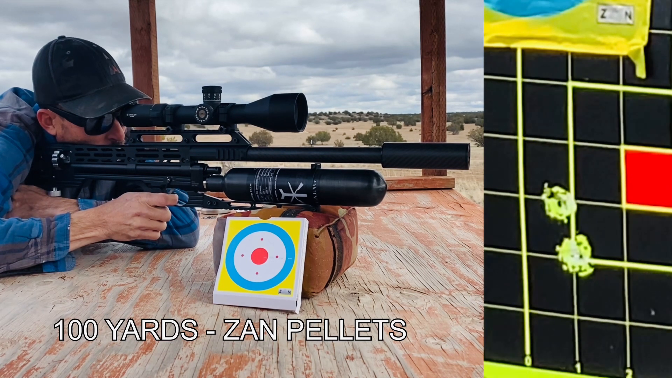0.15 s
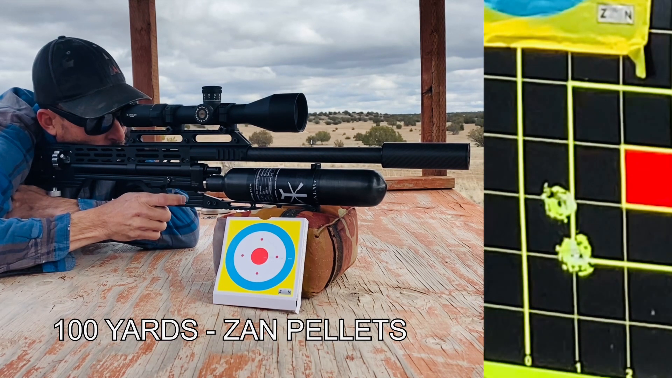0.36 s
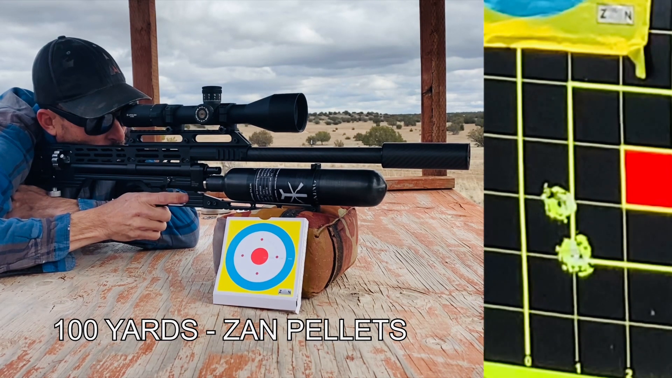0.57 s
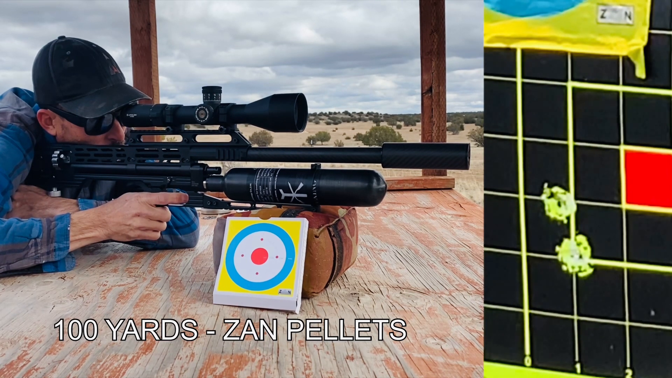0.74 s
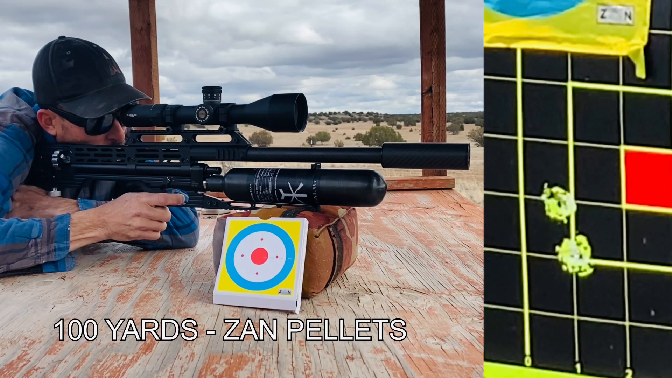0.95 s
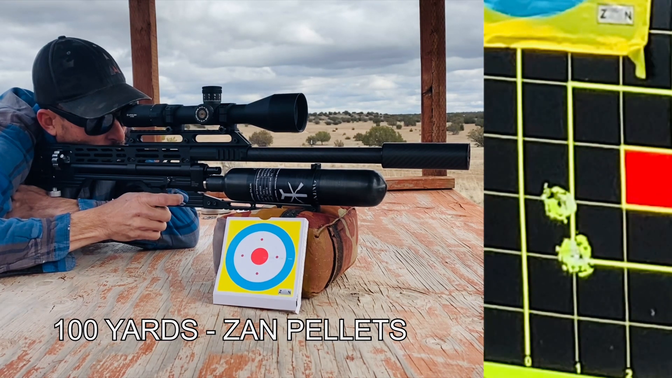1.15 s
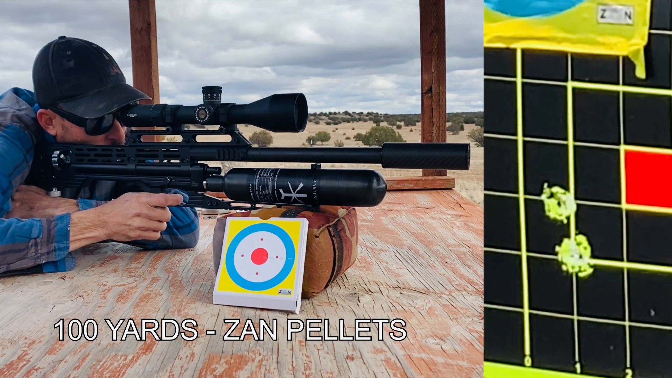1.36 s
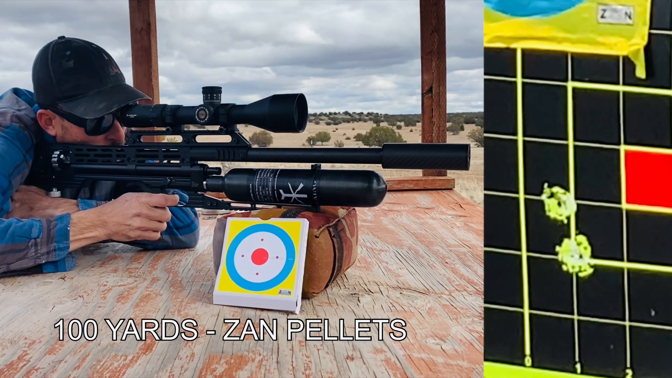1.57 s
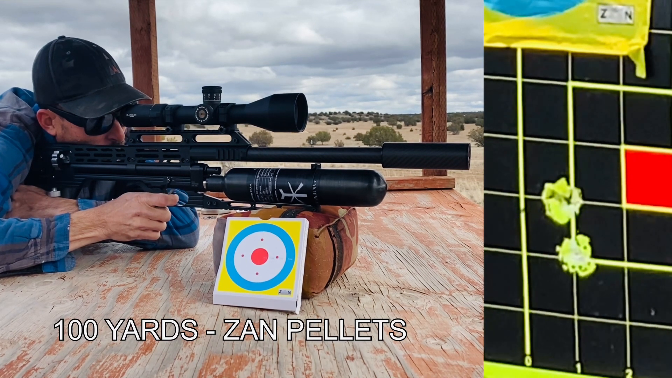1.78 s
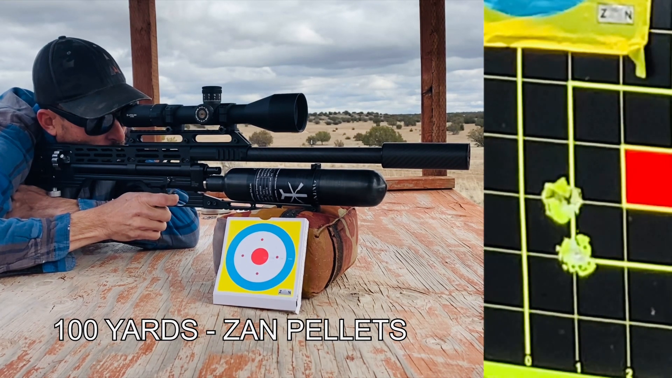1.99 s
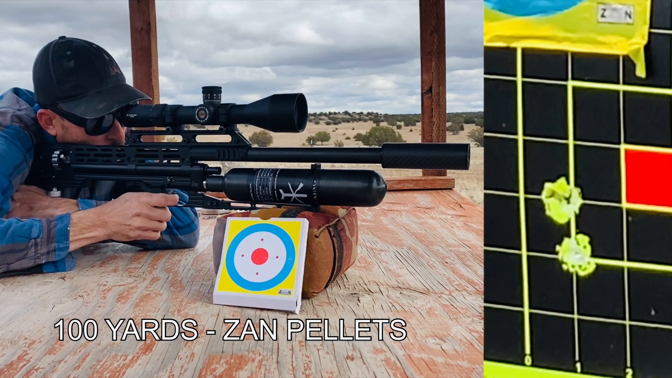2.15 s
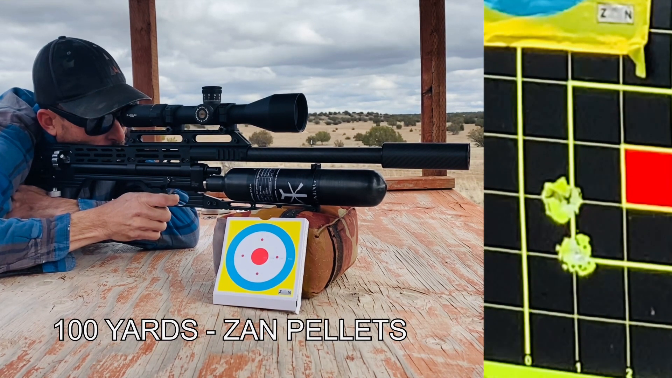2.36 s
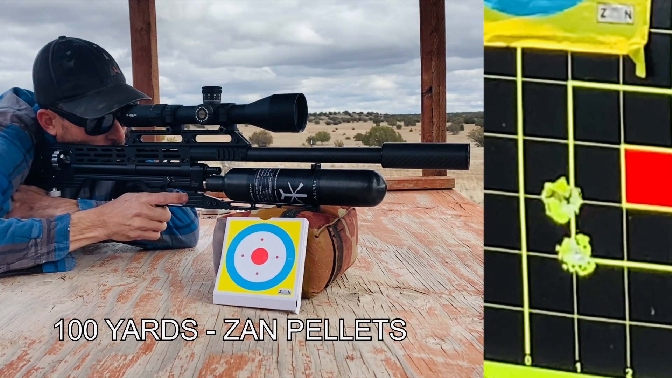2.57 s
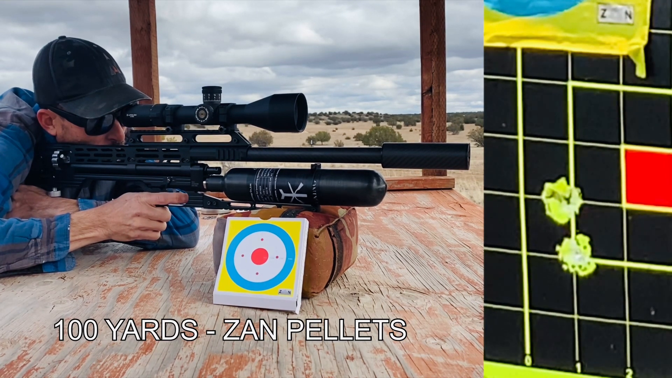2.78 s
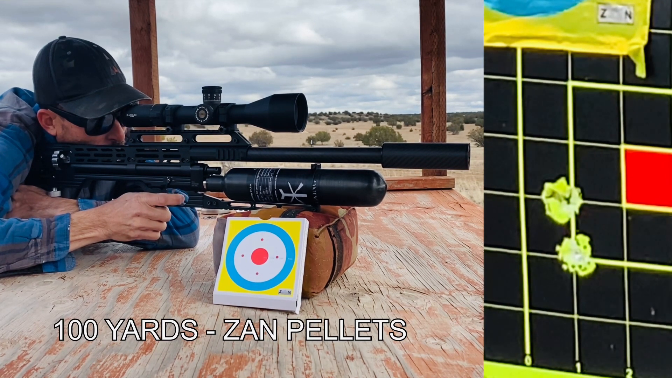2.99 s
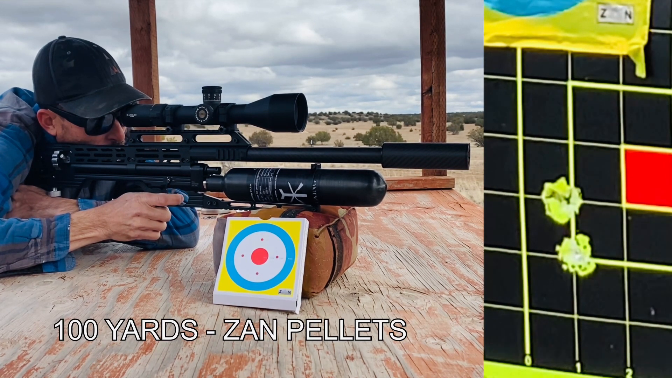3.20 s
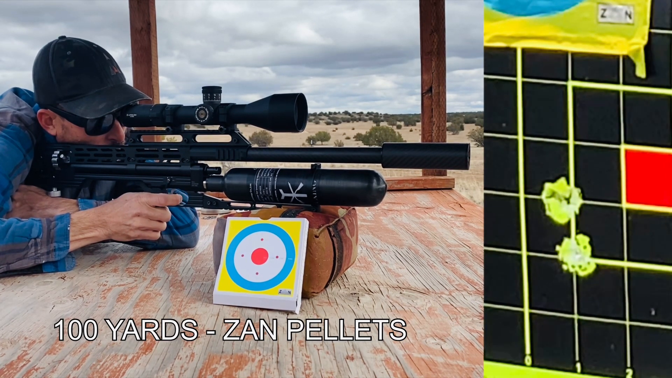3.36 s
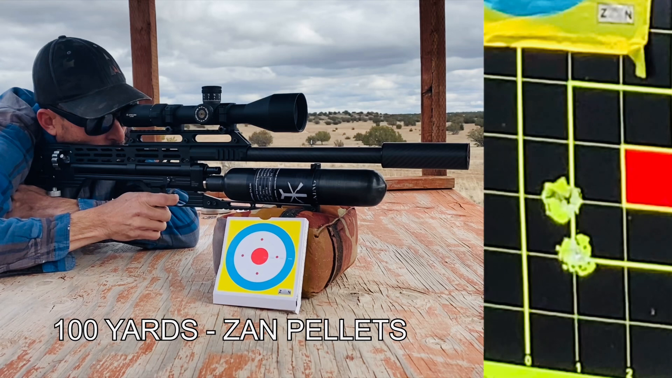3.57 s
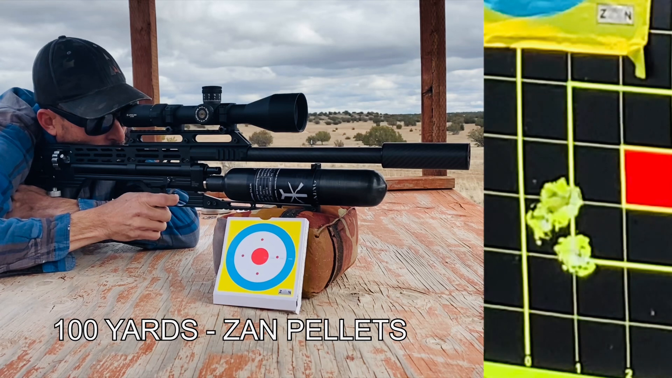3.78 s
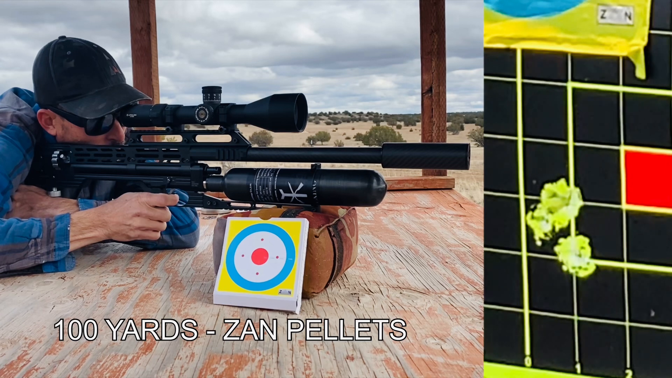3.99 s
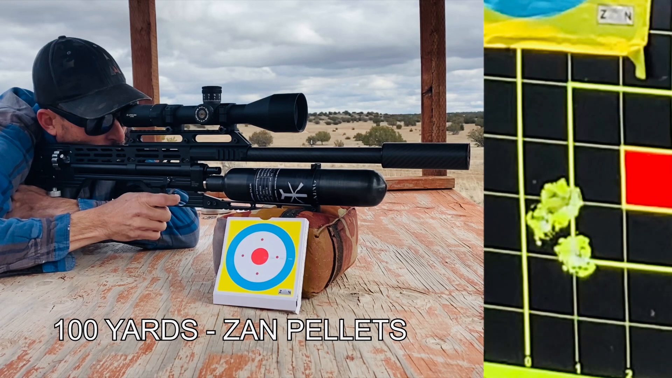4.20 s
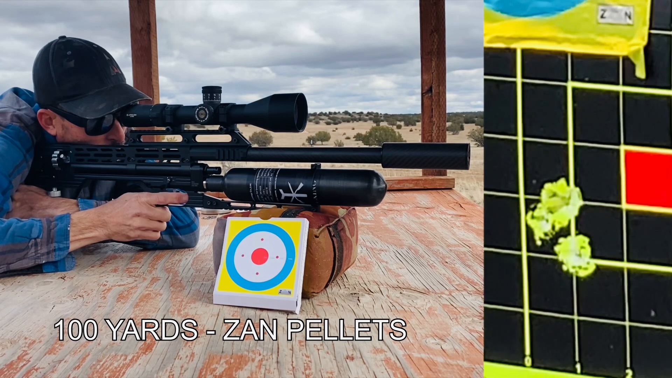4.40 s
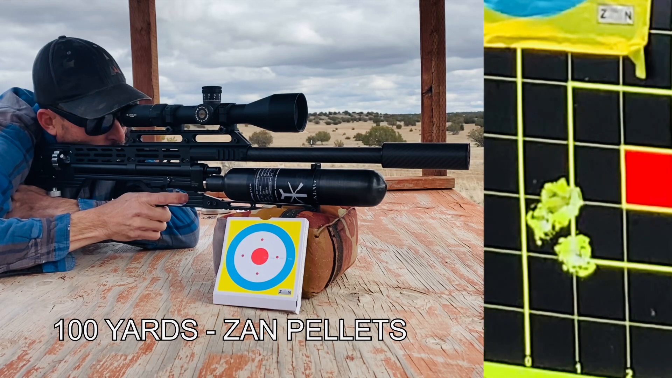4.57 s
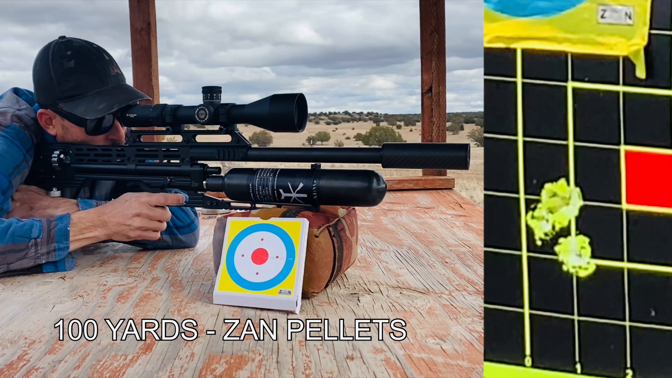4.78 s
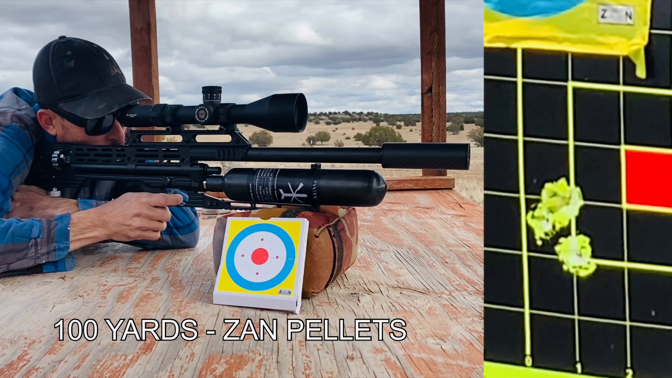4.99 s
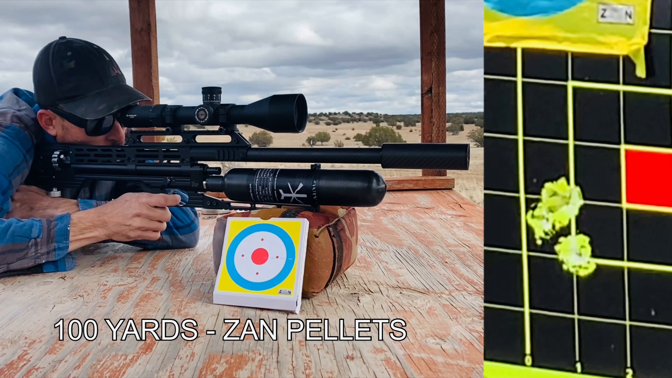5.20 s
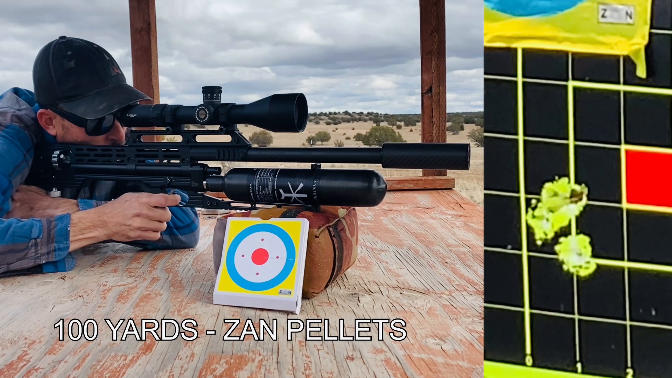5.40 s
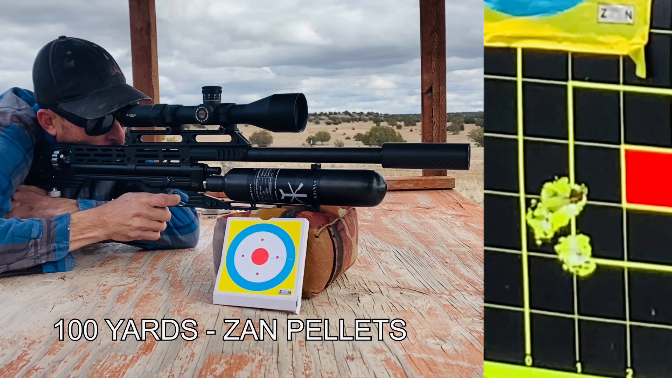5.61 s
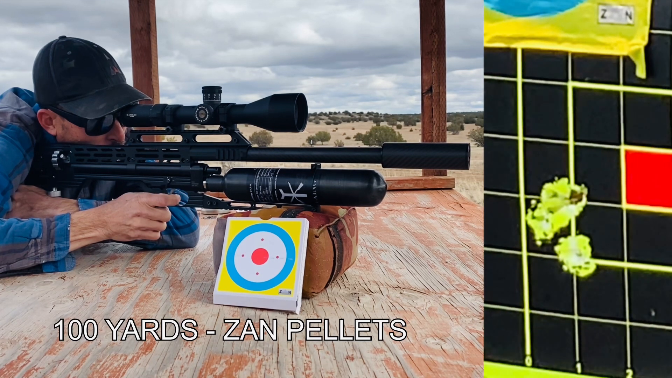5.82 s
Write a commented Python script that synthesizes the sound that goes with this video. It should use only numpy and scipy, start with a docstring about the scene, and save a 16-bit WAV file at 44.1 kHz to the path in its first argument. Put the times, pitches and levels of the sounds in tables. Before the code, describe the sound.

Outdoors under an open shelter, recorded in stereo on a phone about a metre from an air rifle on a wooden bench. At first a low boom and ringing sheet steel from an earlier shot die away, with a faint distant smack at 0.06 s and a small trigger click at 0.4 s. Light wind rumbles and buffets the microphone. At 1.5 s the rifle fires: a very loud, dry crack of air with a short thump, two quick metal clicks and a thin, high whistle sinking away. Nearby steel crashes and rings at 1.7 s; the far target smacks softly at 2.1 s with a grainy swell and hillside echo. A trigger click follows at 2.5 s. The pattern repeats with shots at 3.4 and 5.2 s, clangs at 3.6, the most ringing, and 5.4 s, and distant hits at 4.0 and 5.8 s. A click at 4.3 s and faint dull ticks fall between.

```python
"""First the boom of an earlier shot dies away under an open shelter, sheet steel still rings and a far target is hit.
Then a self-loading air rifle fires three shots from a wooden bench, a metre from the phone: filtered noise hisses,
damped modes thump, a sinking sine is the pellet's whistle and bright noise bursts are the action's clicks.
Sheet steel nearby crashes as noise and rings as modes; the far target comes back late, as noise with an echo.
Behind it all low noise and short sine buffets are the light wind on the two microphone ports."""
import sys
import numpy as np
from scipy import signal
from scipy.fft import rfft, irfft
from scipy.io import wavfile
from scipy.ndimage import uniform_filter1d

SR = 44100
rng = np.random.default_rng(int(sys.argv[2]) if len(sys.argv) > 2 else 0)


def generate_wav(sig):
    """Save sig (samples, or channels by samples) to the path in sys.argv[1] as 16-bit PCM at SR."""
    pcm = np.round(np.clip(np.atleast_2d(sig).T, -1, 1) * 32767).astype(np.int16)
    wavfile.write(sys.argv[1], SR, pcm)


N = 257984  # length [samples]
LEAD = 2048  # samples before the onset in every single sound


# Shots on the bench, a metre away:
# (time [s], blast level [dB], delay of the muzzle thump [s], thump level [dB])
SHOTS = [(1.5185, -13, .0115, -9), (3.3972, -13, .0128, -8), (5.1765, -13, .0115, -10)]


def shot(blast_db, delay_s, thump_db, size=65536):
    """Air and hammer noise reach the ports partly unlike; thump, barrel and whistle are in the shared row only."""
    t = (np.arange(size) - LEAD) / SR
    noises = hammer(t) + blast(t, blast_db) + shelter_boom(size, .022)
    tones = thump(size, delay_s, thump_db) + barrel(size) + whistle(t)
    return noises + np.array([[1], [0]]) * tones


# Colour of the escaping air: (frequency [Hz], relative level [dB per Hz])
BLAST_COLOUR = [(180, -31), (300, -7), (1610, -11), (2930, -11), (3290, -12.5), (7440, -13.5), (8360, -9),
                (9710, -9), (12300, -16.5), (14500, -11.5), (16000, -18.5)]


def blast(t, level_db):
    """Air escapes as noise in ragged puffs; as it slows its treble fades away."""
    dull_hz, dull_s = 6000, .05
    size = len(t)
    air = irfft(noise(BLAST_COLOUR, size), size) * undb(level_db) * blast_shape(t)
    dull = signal.lfilter(*signal.butter(1, dull_hz, fs=SR), air)
    air = dull + (air - dull) * np.exp(-np.maximum(t, 0) / dull_s)
    return air * undb(1.9 * walk(size, 250))


def blast_shape(t):
    """Gain of the escaping air: it rushes out, holds, drops fast, then slower, leaks on and shuts off."""
    rise_db_s, peak_s, peak_db = 11000, .00073, 5.5
    sag_db_s, hold_s, drop_db_s = 349, .014, 1200
    slow_db, slow_db_s = -2.5, 517
    leak_db, shut_s, shut_db_s = -44, .2, 280

    def after(s):
        return np.maximum(t - s, 0)

    burst = undb(peak_db - sag_db_s * after(peak_s) - drop_db_s * after(hold_s))
    slow = undb(slow_db - slow_db_s * after(peak_s)) * (t > hold_s)
    leak = undb(leak_db - shut_db_s * after(shut_s))
    return np.maximum(burst, slow + leak) * undb(-rise_db_s * np.maximum(peak_s - t, 0))


# Modes of the muzzle thump: (frequency [Hz], relative level [dB], t60 [s])
THUMP_MODES = [(244, -9, 0.025), (295, 0.5, 0.029), (432, -6, 0.035), (474, -8, 0.053), (649, -1, 0.033),
               (822, -5, 0.025), (980, -11, 0.03)]
# Modes of the wooden bench: (frequency [Hz], relative level [dB], t60 [s])
BENCH_MODES = [(65, -33, 0.17), (116, -18.5, 0.1), (136, -29, .09)]


def thump(size, delay_s, level_db):
    """Three short blows excite the muzzle modes; a softer one, the kick, excites the bench."""
    blows = push(size, delay_s, .0002)
    blows += .55 * push(size, delay_s - .0052, .0002)
    blows += .15 * push(size, .001, .0003)
    bench = ring(BENCH_MODES, push(size, delay_s + .003, .0018))
    return bench - undb(level_db) * ring(THUMP_MODES, blows)


# Colour of the hammer's run-up: (frequency [Hz], relative level [dB per Hz])
HAMMER_COLOUR = [(100, -3), (400, -2.5), (1500, -9), (4000, -9.5), (8000, -39.5)]


def hammer(t):
    """The hammer runs up as noise swelling steeply for 14 ms to the shot, and dies as steeply."""
    size = len(t)
    return irfft(noise(HAMMER_COLOUR, size), size) * undb(-28 - 2000 * np.abs(t)) * (t > -.014)


# Modes of the barrel: (frequency [Hz], relative level [dB], t60 [s])
BARREL_MODES = [(3880, -51.5, 0.36), (4050, -51, .22), (3990, -48.5, .12), (6900, -40, 0.06)]


def barrel(size):
    """The bolt chatters against the barrel for a few ms, so its modes ring roughly."""
    chatter = 30 * rng.standard_normal(size) * push(size, .027, .005)
    return ring(BARREL_MODES, chatter) * undb(4 * walk(size, 300))


def whistle(t):
    """The pellet's unsteady whistle sinks by a share per second as it slows and fades ever faster."""
    start_hz, slowing_per_s = 11750, .306
    level_db, fade_db_s2, from_s = -51.5, 275, .03
    size = len(t)
    hz = start_hz * np.exp(-slowing_per_s * t)
    wobble_hz = 700 * uniform_filter1d(rng.standard_normal(size), size=200)
    tone = np.sin(2 * np.pi * np.cumsum(hz + wobble_hz) / SR)
    tone *= undb(level_db - fade_db_s2 * t ** 2) * (t > from_s)
    return tone * undb(4 * walk(size, 350))


# Boom of the open shelter: (frequency [Hz], relative level [dB per Hz], t60 [s])
SHELTER_BANDS = [(50, -5.5, 5.8), (118, -5.5, 3.5), (194, 3.5, 1.6), (400, -19, 3.1), (900, -25, .6),
                 (2000, -35.5, .4)]


def shelter_boom(size, rise_s):
    """The shelter answers a shot with noise whose bands die at their own rates."""
    return undb(-48.5) * fading(SHELTER_BANDS, size, rise_s)


# The action opens and closes, a metre away:
# (time after the shot [s], level [dB], knock re snap [dB], knock pitch [Hz], t60 [s])
ACTION = [(.103, -40.5, 8, 2720, 0.096), (.1836, -43, 9.5, 5140, 0.089)]
# Trigger resets: (time [s], level [dB])
RESETS = [(.401, -40), (2.480, -38), (4.303, -39)]
# Sound of every reset: (knock re snap [dB], knock pitch [Hz], t60 [s])
RESET_SOUND = (-22, 2750, .047)
# Colour of the metal snap: (frequency [Hz], relative level [dB per Hz])
SNAP_COLOUR = [(2350, -25), (4000, -23.5), (6360, -24), (7440, -9.5), (8500, -11), (10100, 0.5),
               (12000, -7), (14700, -4), (16000, -22)]
# Colour of the knock: (multiple of the knock pitch [1], relative level [dB per Hz])
KNOCK_COLOUR = [(.1, -12), (.3, -9), (.6, -9), (.85, -8.5), (1.15, -6), (1.502, -11), (2.2, -15)]


def click(level_db, knock_db, knock_hz, t60, size=8192):
    """Metal parts meet: snap and knock noise share a quick decay and two weaker, slower ones."""
    t = (np.arange(size) - LEAD) / SR
    knock = noise([(knock_hz * multiple, db) for multiple, db in KNOCK_COLOUR], size)
    body = irfft(noise(SNAP_COLOUR, size) + undb(knock_db) * knock, size)
    decay = undb(-60 * t / .0045) + undb(-8 - 60 * t / t60) + undb(-22 - 60 * t / .097)
    decay *= undb(3 * walk(size, 90))
    return undb(level_db) * body * decay * np.clip(t / .0008, 0, 1)


# Clangs of the sheet steel nearby; the first belongs to an earlier shot:
# (time [s], relative crash level [dB], relative ring level [dB], place of the blow [1], treble tilt at 10 kHz [dB])
CLANGS = [(-.355, -31.5, -52.5, 1, 21), (1.717, -35.5, -40.5, 0.75, 6), (3.594, -33, -31.5, 0.99, 8.5),
          (5.375, -34, -43.5, -1.36, 0.5)]
# Noise of the crash: (frequency [Hz], relative level [dB per Hz], t60 [s])
CRASH_BANDS = [(139, 4.5, 0.74), (374, -7, 0.94), (930, 3, 0.76), (1510, 3, 0.48), (2410, -3, 0.88),
               (3050, -3.5, 0.36), (4770, -8.5, 0.31), (7600, -13, 0.3), (10200, -23.5, 0.34),
               (12900, -15.5, 0.27), (17200, -40, 0.22)]
# Modes of the sheet: (frequency [Hz], relative level [dB], t60 [s], place where a blow excites it best [1])
SHEET_MODES = [(576, -2, 0.74, -0.53), (670, -23.5, 1.54, 0.27), (720, -7.5, 1.18, -0.78),
               (734, -7, 0.58, -1.3), (809.5, -4.5, 0.96, 0.21), (840, 6.5, 1.005, -0.42),
               (960, -2, 0.68, -1), (923, -8, 1.4, -0.48), (990, -11.5, 0.97, 1), (1160, -7, 0.15, -1),
               (1195, -11, 1.12, 0.26), (1300, -24, 1.9, 0.17), (1160, -2, 0.081, 0.57),
               (1440, -9, 0.99, 0.062), (1473, 20.5, 0.055, -0.51), (1704, -23.5, 1.06, 1),
               (1715, -22, 1.2, 0.19), (1610, -23, 0.28, 0.61), (1873, -29, 0.21, -1.9),
               (1890, -16, 1.55, 0.24), (2142, -8.5, 0.36, 0.35), (2100, -20, 1.3, 0.081),
               (2164, -18.5, 1.33, 0.61), (2194, -23.5, 1.06, 1), (2150, -6.5, 0.51, -1.7),
               (2370, -4, 0.6, -0.32), (2830, -17, 0.64, -0.85), (3570, -5, 0.2, -0.06)]


def clang(crash_db, ring_db, place, tilt_db, size=49152):
    """Sheet steel crashes, is knocked twice and rings; the place of the blow picks the modes."""
    colour = [(hz, db + tilt_db * np.clip(hz / 10000, 0, 1), t60) for hz, db, t60 in CRASH_BANDS]
    crash = fading(colour, size, .00033) * undb(1.3 * walk(size, 330))
    knocks = push(size, .0015, .0005) + push(size, .008, .0005)
    # a mode near 0 Hz, pushed by an imaginary blow, is a plain decay
    knock_decay = ring([(.015, 0, .11)], 1j * knocks)
    knocked = irfft(noise(colour, size), size) * knock_decay
    # a few ms of rattle drives the sheet, so the modes start out of step
    rattle = rng.standard_normal((2, size)) * np.sqrt(push(size, .0051, .0015))
    blow = .2 * rattle + push(size, .002, .00005)
    sheet = 0
    for hz, db, t60, best in SHEET_MODES:
        mode = ring([(hz, db - 9 * (place - best) ** 2, t60)], blow)
        sheet = sheet + mode * undb(2 * walk(size, 1500))  # the sheet sways: each mode wavers alone
    t = (np.arange(size) - LEAD) / SR
    ring_gain = undb(ring_db - 19.6 * t ** 2)  # the frame damps the faint end harder
    return undb(crash_db) * (knocked + undb(-6.5) * crash) + ring_gain * sheet


# Hits on the far target; the first belongs to an earlier shot:
# (time [s], smack level [dB], relative swell level [dB], relative level of the hillside echo [dB])
TARGET_HITS = [(.063, -47, -65.5, -71.5), (2.134, -51, -60, -72), (4.011, -54, -53, -70),
               (5.793, -52.5, -60.5, -65)]
# Smack and swell, dulled by the air: (frequency [Hz], relative level [dB per Hz], t60 of the swell [s])
TARGET_BANDS = [(880, -17.5, 1), (1760, -6, 0.53), (2160, -2.5, 0.31), (2710, -9.5, 0.65), (3650, -9, 0.52),
                (5440, -3, 0.23), (7600, -13.5, 0.31), (10400, -29, 0.3), (13000, -54, .05)]
# Echo off the hillside: (frequency [Hz], relative level [dB per Hz], t60 [s])
ECHO_BANDS = [(895, -34, 0.22), (1580, 0, .25), (2160, -1, 0.28), (2670, 2, 0.28), (4400, -40, 0.05),
              (9000, -28, 0.063), (12000, -50, .05)]


def target(smack_db, swell_db, echo_db, size=32768):
    """The far smack is short noise; scrub scatters it into a grainy swell, a hillside throws it back once."""
    echo_s = .066
    t = (np.arange(size) - LEAD) / SR
    smack = irfft(noise(TARGET_BANDS, size), size) * undb(smack_db - 60 * t / .02) * (t > 0)
    accent = 1 + undb(4 - 60 * np.abs(t) / .03)  # stresses the echo's onset
    echo = np.roll(fading(ECHO_BANDS, size, .001) * accent, int(echo_s * SR), axis=1)
    swell = fading(TARGET_BANDS, size, .012) * undb(2.5 * walk(size, 200))
    return smack + undb(swell_db) * swell + undb(echo_db) * echo


# Faint ticks from the side of the steel: (time [s], relative level [dB], centre frequency [Hz])
TICKS = [(1.869, -69.5, 2980), (2.056, -71, 3420), (2.375, -66.5, 1350), (2.673, -62.5, 1570),
         (3.748, -65, 3020), (5.526, -60, 2900), (5.719, -70, 2486)]


def tick(level_db, hz, size=8192):
    """A faint dull tick: a short band of noise around one frequency, dying within some 40 ms."""
    bands = [(hz / 5, -20, .04), (hz / 2, -4, .04), (hz, 0, .045), (hz * 1.6, -5, .035), (hz * 3.2, -30, .03)]
    return undb(level_db) * fading(bands, size, .001)


# Buffets at the ports: (time [s], level [dB], frequency [Hz], sharper flap re buffet [dB])
BUFFETS = [(0.685, -53, 109, -19), (0.859, -57, 69, -5), (0.905, -51, 59.2, -5.5),
           (1.038, -52.5, 97.4, -18), (1.388, -50.5, 63.7, -37), (2.638, -53.5, 64.6, -27),
           (2.765, -50, 66, -19), (2.863, -37, 72.7, -20), (3.083, -47, 54.3, -35), (4.206, -54, 70.0, -22),
           (4.474, -40, 61, -5.5), (4.503, -40, 91.5, -5), (4.613, -50, 75.4, -39),
           (4.725, -46.5, 54.7, -13)]
# Colour of the wind: (frequency [Hz], relative level [dB per Hz])
WIND_COLOUR = [(12, -48), (20, -19), (48, -2), (71, -4), (119, -6.5), (167, -28), (209, -20), (394, -45.5),
               (555, -39), (1200, -58.5), (1560, -89), (2640, -120)]
# Course of the wind before the random gusts: (time [s], level [dB])
WIND_LEVEL = [(0, -61), (.3, -78), (.6, -67.5), (1, -66), (1.4, -72), (2.2, -57.5), (2.7, -73),
              (3.3, -68.5), (4.1, -58.5), (4.6, -63), (4.9, -76), (5.85, -61)]


def wind():
    """Turbulence rumbles as gusting low noise, partly opposed at the ports, with buffets of a few cycles."""
    buffet_s = .043
    t = np.arange(N) / SR
    steps = np.repeat(rng.standard_normal(N // 2400 + 1), 2400)
    gust = uniform_filter1d(uniform_filter1d(steps, size=1600), size=1600)[:N]
    level_db = np.interp(t, *np.transpose(WIND_LEVEL)) + 5 * gust
    shared, opposed = irfft(noise(WIND_COLOUR, N), N) * undb(level_db)
    out = shared + .45 * opposed * np.array([[1], [-1]])
    for (s, db, hz, flap_db), turn in zip(BUFFETS, rng.random((len(BUFFETS), 1))):
        progress = np.clip((t - s) / buffet_s, 0, 1)
        swell = np.sin(np.pi * progress) ** 2
        phase = 2 * np.pi * (hz * (t - s) + turn)
        flap = undb(flap_db) * swell ** 12 * np.sin(2.2 * phase)
        out += undb(db) * swell * (np.sin(phase) + flap)
    return out


def undb(db):
    """Amplitude gain of a level in dB."""
    return 10 ** (np.asarray(db) / 20)


def read(table, hz, axis=1):
    """A column of a spectrum table at the given frequencies, interpolated over log frequency."""
    t = np.array(table, float)
    return np.interp(np.log(np.maximum(hz, 1)), np.log(t[:, 0]), t[:, axis])


def noise(table, size):
    """Spectra of two unrelated noises of rms 1 in the colour of a table."""
    gain = undb(read(table, np.fft.rfftfreq(size, 1 / SR)))
    return rfft(rng.standard_normal((2, size))) * gain / np.sqrt(np.mean(gain ** 2))


def fading(table, size, rise_s):
    """Noise that sets in at LEAD and dies in half-octave bands, after the t60 column."""
    t = (np.arange(size) - LEAD) / SR
    spectrum = noise(table, size)
    place = 2 * np.log2(np.maximum(np.fft.rfftfreq(size, 1 / SR), 30) / 30)  # half octaves above 30 Hz
    out = 0
    for k in range(19):
        band = irfft(spectrum * np.maximum(1 - abs(place - k), 0), size)
        t60 = max(read(table, 30 * 2 ** (k / 2), axis=2), .01)
        out = out + band * undb(-60 * np.maximum(t, 0) / t60)
    return out * np.clip(t / rise_s, 0, 1)


def ring(modes, drive):
    """Damped modes, each a one-pole complex resonator, driven by a blow."""
    out = 0
    for hz, db, t60 in modes:
        pole = np.exp(2j * np.pi * hz / SR - np.log(1000) / (t60 * SR))
        out = out + undb(db) * signal.lfilter([1], [1, -pole], drive).imag
    return out


def push(size, at_s, contact_s):
    """A rounded (Gaussian) blow of unit area."""
    x = ((np.arange(size) - LEAD) / SR - at_s) / contact_s
    shape = np.exp(-x ** 2)
    return shape / shape.sum()


def walk(size, hold):
    """Random levels held for some samples and slewed; spread near 1."""
    steps = np.repeat(rng.standard_normal(size // int(hold) + 1), int(hold))
    return 1.2 * uniform_filter1d(steps, int(hold))[:size]


# What the two ports make of each direction, three tables each: (frequency [Hz], phase by which left leads [rad]),
# (frequency [Hz], left minus right [dB]), (frequency [Hz], likeness of the ports [1])
AT_GUN = ([(0, -1.5), (150, -1.4), (600, -1.2), (1030, -.6), (1380, 1.4), (2070, -1.2), (2800, .3),
          (6300, .8), (8610, -3.4), (11000, -7.6), (16000, -16.1)], [(60, 2.5), (110, 4.0), (200, -1.0),
          (380, 0.0), (700, 0.5), (1290, -3.0), (2380, 1.0), (4400, 2.5), (8120, 0.0), (15000, 0.0)],
          [(100, .97), (600, .85), (2000, .6), (5500, .5), (8000, .95), (16000, .95)])
AT_STEEL = ([(0, 0), (1000, 1.2), (2070, -1.5), (2900, -3.1), (3800, -5.8), (5500, -5.8), (7500, -5.2),
            (8500, -6.3), (16000, -7.5)], [(60, 0.0), (110, 0.0), (200, -1.0), (380, 1.5), (700, 8.0),
            (1290, 6.0), (2380, 2.5), (4400, 0.0), (8120, 0.0), (15000, 0.0)], [(100, .95), (1500, .92),
            (2600, .6), (4000, .9), (9000, .95), (16000, .8)])
AT_TARGET = ([(0, 0), (1400, 2.5), (3300, -1), (5340, -6), (7400, -11.5), (9500, -17), (16000, -32)],
             [(300, 0), (900, 5), (2400, -1), (4000, 4), (6000, 10), (8000, -6), (10000, 0)], [(100, .9),
             (1200, .5), (3000, .8), (10000, .9)])


def add(out, pair, s, ports):
    """Lays a sound on both ports; the second row is what the ports do not share."""
    phase, balance, likeness = ports
    size = pair.shape[1]
    hz = np.fft.rfftfreq(size, 1 / SR)
    turn = undb(read(balance, hz) / 2) * np.exp(.5j * np.interp(hz, *np.transpose(phase)))
    alike = np.clip(read(likeness, hz), 0, 1)
    shared, unshared = rfft(pair)
    same = np.sqrt((1 + alike) / 2) * shared
    other = np.sqrt((1 - alike) / 2) * unshared
    both = irfft(np.array([(same + other) * turn, (same - other) / turn]), size)
    at = np.arange(size)
    both *= np.clip(np.minimum(2 * at / LEAD, 4 - 4 * at / size), 0, 1)  # soft ends
    start = int(s * SR) - LEAD
    stop = min(start + size, N)
    out[:, max(start, 0):stop] += both[:, max(-start, 0):stop - start]


def scene():
    """Wind and the boom of an earlier shot, then every table of events from its own direction."""
    out = wind()
    add(out, shelter_boom(65536, .03), -.55, AT_GUN)
    clicks = [(s + after_s, *sound) for s, *_ in SHOTS for after_s, *sound in ACTION]
    clicks += [(*reset, *RESET_SOUND) for reset in RESETS]
    layers = ((SHOTS, shot, AT_GUN), (clicks, click, AT_GUN), (CLANGS, clang, AT_STEEL),
              (TARGET_HITS, target, AT_TARGET), (TICKS, tick, AT_STEEL))
    for table, source, ports in layers:
        for s, *controls in table:
            add(out, source(*controls), s, ports)
    return out


# Colour of the phone's hiss: (frequency [Hz], relative level [dB per Hz])
HISS_COLOUR = [(300, -2), (1000, -7.5), (3000, -11.5), (8000, -18.5), (20000, -23)]


def record(dry):
    """The phone cuts deep bass, clips the peaks and cuts the top; a faint hiss lies under all."""
    bass_hz, top_hz, hiss_db = 52, 16200, -100
    bass_cut = signal.butter(3, bass_hz, "high", fs=SR, output="sos")
    clipped = np.clip(signal.sosfilt(bass_cut, dry), -.95, .95)
    top_cut = signal.ellip(10, .2, 70, top_hz, fs=SR, output="sos")
    hiss = undb(hiss_db) * irfft(noise(HISS_COLOUR, N), N)
    return signal.sosfilt(top_cut, clipped) + hiss


dry = scene()
out = record(dry)
generate_wav(out)
```